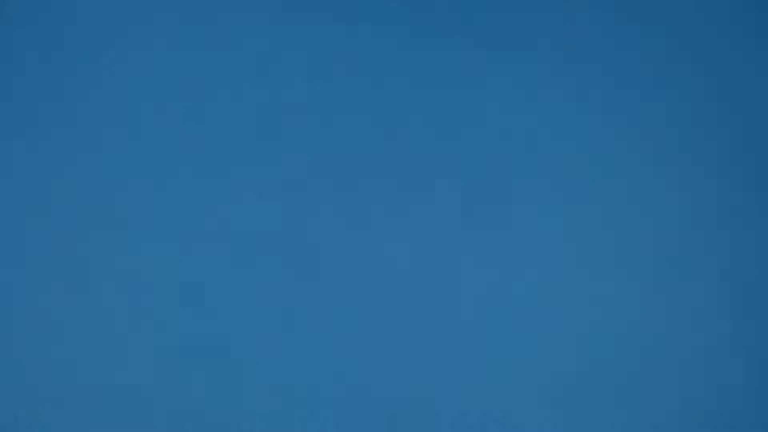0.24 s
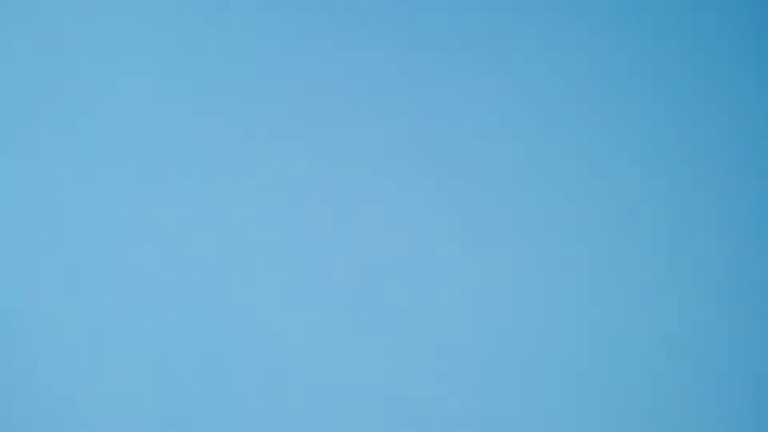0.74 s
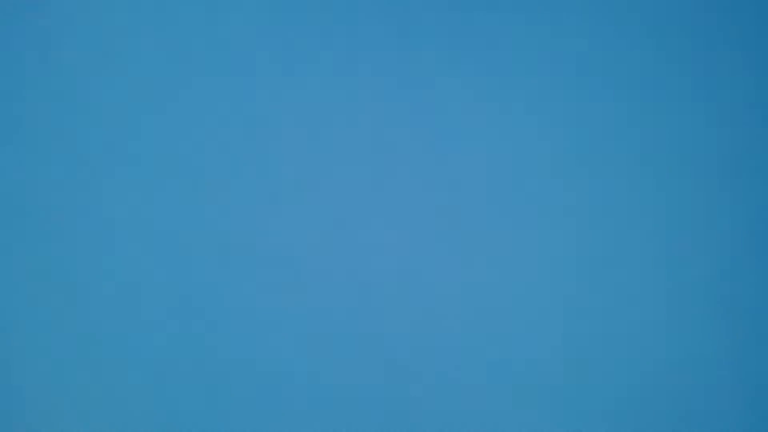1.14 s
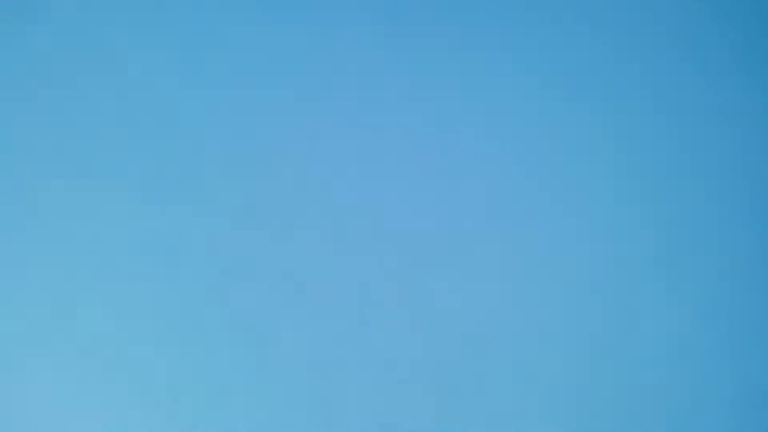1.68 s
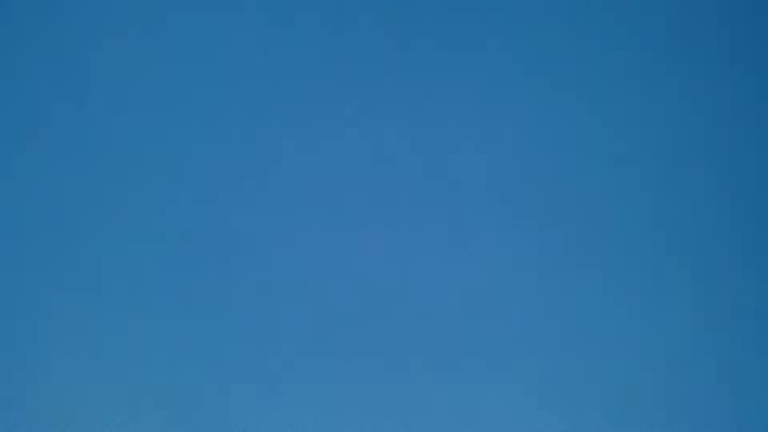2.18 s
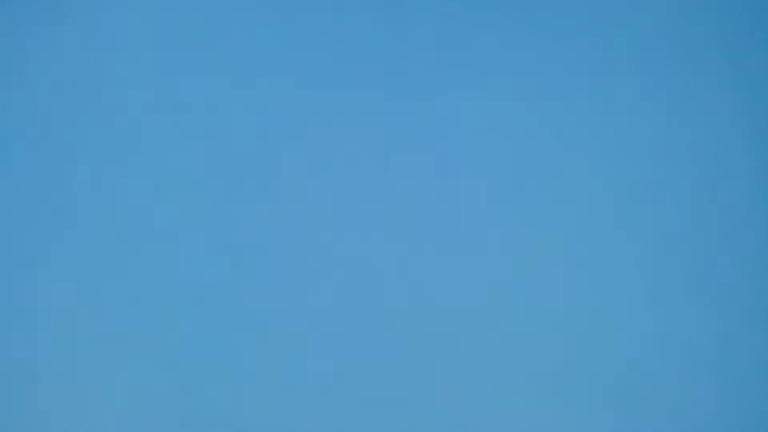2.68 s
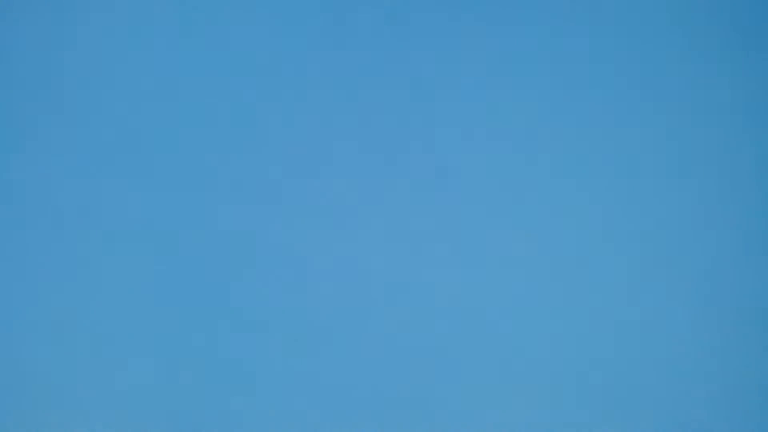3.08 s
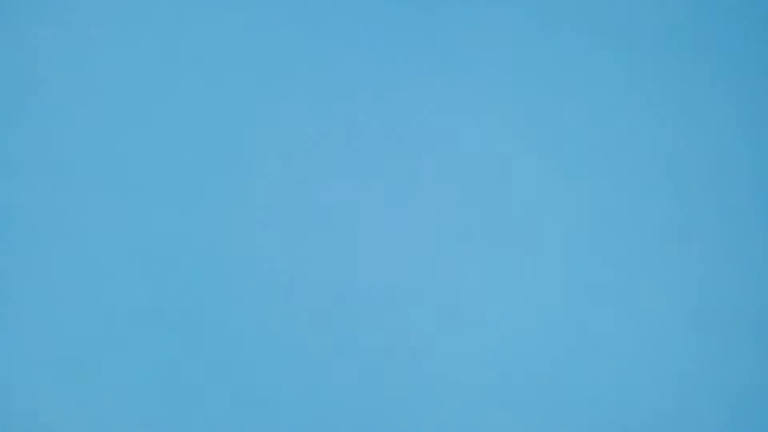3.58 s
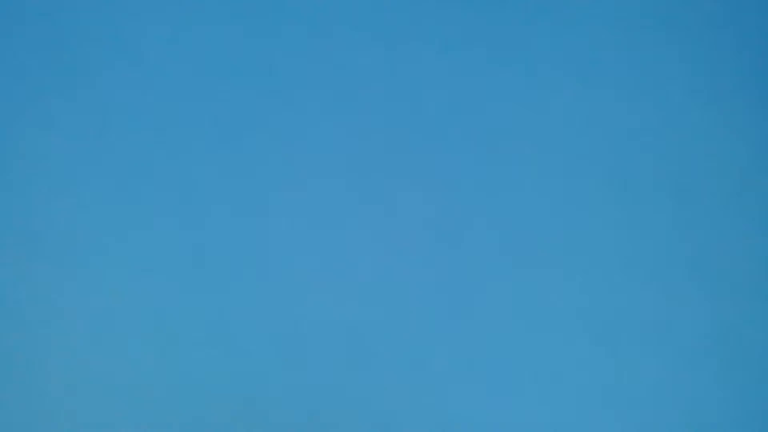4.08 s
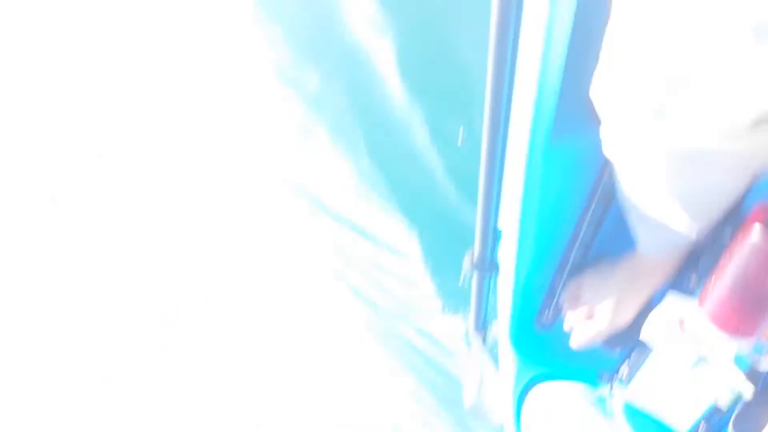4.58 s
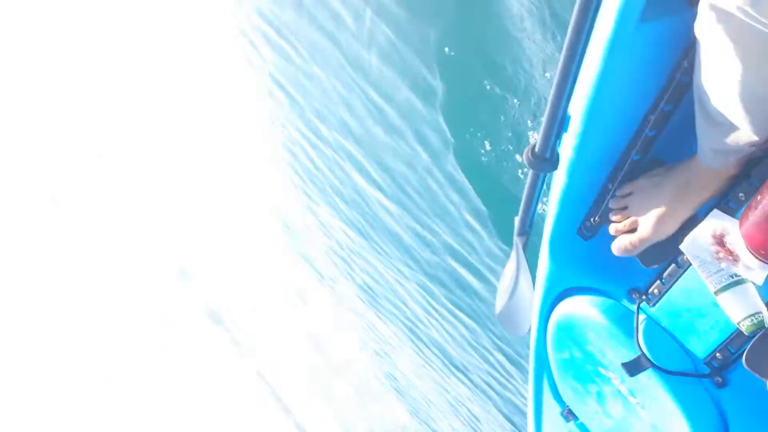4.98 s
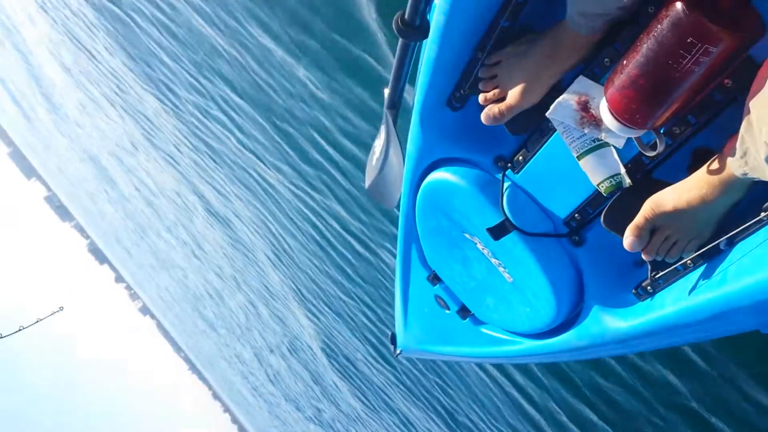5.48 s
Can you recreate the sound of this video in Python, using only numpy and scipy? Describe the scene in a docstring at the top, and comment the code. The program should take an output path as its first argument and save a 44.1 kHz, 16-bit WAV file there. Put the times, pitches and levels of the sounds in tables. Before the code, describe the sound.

Fishing line hisses through rod guides close to the microphone, in quick surges from about 0.2 to 1.5 seconds. A rough whine glides up and down with each tug, dotted with sharp, dry snaps. Small waves slap softly under the kayak around 1.8 seconds, and at 2.2 something thuds on the plastic hull with a brief rub. A second run of hissing, singing line and snaps lasts from 2.8 to 3.4 seconds, followed by single ticks of the reel. From 4 to 4.5 seconds gear knocks on the hull several times while a hand scrapes the microphone, mostly on the left. The drag buzzes in four short spurts at about 4.1, 4.7, 5.4 and 5.6 seconds, each speeding up and slowing, the last three with a light metallic ring. Soft low wind and rippling sea continue underneath, dropping toward the end.

```python
"""Fishing line hisses and sings through the rod guides as a big fish pulls two runs of quick surges.
Then the reel's drag pawl ticks and buzzes in spurts, tooth by tooth, and the metal spool rings.
We are on a kayak at sea, the two microphone ports of a small hand-held camera close to the reel.
Gear knocks on the plastic hull and a hand rubs the camera, over soft wind and water."""
import sys
import numpy as np
from scipy import signal
from scipy.fft import rfft, irfft
from scipy.io import wavfile
from scipy.ndimage import uniform_filter1d

SR = 44100
rng = np.random.default_rng(int(sys.argv[2]) if len(sys.argv) > 2 else 0)


def log_audio(samples):
    """Write samples as a 16-bit WAV file to the path given in sys.argv[1]."""
    # one column per channel
    frames = np.atleast_2d(samples).T
    # limit to full scale, then quantise
    limited = np.clip(frames, -1, 1)
    pcm = np.round(limited * 32767).astype(np.int16)
    wavfile.write(sys.argv[1], SR, pcm)


N = 252894
TIME = np.arange(N) / SR
FREQS = np.fft.rfftfreq(N, 1 / SR)

# The reel's balance at the microphone. Each row: frequency in Hz, left over right in dB.
REEL_LEAN = [(300, 7), (2400, 14.5), (4400, 10.5), (5600, 5), (8200, -16), (15000, -22)]
# The tone of a dry crack, of line or on the hull. Each row: frequency in Hz, relative level in dB.
CRACK_SPECTRUM = [(300, -23.5), (1100, 3), (3200, 0.5), (5400, 12), (15000, -17.5)]


def running_line(hiss_db=1.54, song_db=1.5, flutter_db=1.73, wobble=0.02005, usual_hz=2010):
    """Close by, braid rasps over the guides; its weave gives a rough whine that glides with speed."""
    # The rasp of the guides. Each row: frequency in Hz, relative level in dB.
    hiss_spectrum = [(800, -32), (1300, -13.5), (2050, -8.5), (2450, -16.5), (3200, -11), (4200, -5.5),
                     (5100, 3.5), (6200, -1.5), (6900, 2.5), (7900, -5), (8600, -2), (9750, 1), (10900, -2),
                     (11500, -3), (12300, -5), (13600, -1), (15000, -11.5)]
    # The whine of the weave. Each row: multiple of the pitch, relative level in dB.
    partials = [(2 / 3, -4.5), (1, 2.6), (4 / 3, -9), (2, -9.5)]
    pitch, hiss_gain, song_gain = surges()
    pitch = pitch * (1 + wobble * wander(25))  # the spool slips unevenly
    rasp = patches(noise(0.21), depth_db=3.5) * amp(flutter_db * wander(160))
    hiss = unit(colour(rasp, hiss_spectrum, curve(REEL_LEAN))) * hiss_gain
    song = 0
    for jitter, voice_db in [(0.0114, 0), (0.06, -7)]:  # even weave sings, frayed strands blur the pitch
        cycles = np.cumsum(pitch * (1 + jitter * wander(310))) / SR
        for multiple, db in partials:
            song += amp(voice_db + db + 5.86 * wander(60)) * np.sin(2 * np.pi * multiple * cycles)
    body = amp(curve(hiss_spectrum))  # overtones flare as they glide through these resonances
    body /= np.interp(usual_hz, FREQS, body)
    whine = irfft(rfft(song * song_gain) * body * pan(curve(REEL_LEAN)), N)
    return amp(hiss_db) * hiss + amp(song_db) * whine


def surges(song_lag_s=0.013, hiss_db_per_octave=8.5, song_db_per_octave=9):
    """Each tug drags line out: the fastest sets the pitch, hiss follows speed, song comes just after."""
    # Tugs of the fish. Each row: time of full speed and half-width in seconds, top pitch in Hz,
    # relative hiss and song levels in dB.
    tugs = [(0.214, 0.041, 1883, -28.5, -49), (.305, 0.068, 2146, -27, -50), (0.457, 0.076, 2040, -28, -44),
            (.63, 0.098, 2450, -25, -43), (.745, .082, 2073, -25, -42.5), (.972, 0.1, 2710, -21.5, -41),
            (1.084, 0.063, 2155, -23.5, -39), (1.39, 0.072, 2285, -33, -46.5),
            (1.475, .06, 1951, -40.5, -48), (2.83, .07, 2363, -28.5, -46.5),
            (2.966, 0.079, 2275, -29, -48.5), (3.094, 0.1, 2750, -25, -46.5), (3.245, .1, 2320, -26, -45),
            (3.355, .033, 2056, -23, -40)]
    pitch = hiss_gain = song_gain = 0
    for s, width, top_hz, hiss_db, song_db in tugs:
        speed = bell(s, width) + 1e-12
        late_speed = bell(s + song_lag_s, width) + 1e-12
        pitch = np.maximum(pitch, top_hz * speed)
        hiss_gain = np.maximum(hiss_gain, amp(hiss_db + hiss_db_per_octave * np.log2(speed)))
        song_gain = np.maximum(song_gain, amp(song_db + song_db_per_octave * np.log2(late_speed)))
    return pitch, hiss_gain, song_gain


def line_snaps(level_db=-4, spike_db=9):
    """The line snaps free of the coils beneath it: one spike and a brief spray of noise."""
    # Snaps of the line. Each row: start in seconds, relative level in dB.
    snaps = [(.378, -12), (.385, -8), (.569, -7), (.686, -19), (.7385, -21), (.8175, -10.5), (1.0542, -8),
             (1.614, -28), (1.7765, -19), (1.9545, -20.5), (3.0718, -12), (3.138, -8), (3.149, -12.5),
             (3.225, -20), (3.3515, -5.5), (4.876, -35), (5.0315, -33.5), (5.147, -41)]
    hits = strikes(snaps)
    spray = convolve(hits, decay(t60=0.005)) * noise(0.075)
    return amp(level_db) * colour(amp(spike_db) * hits + spray, CRACK_SPECTRUM, lean_db=2.5)


def reel_drag(pawl_db=-6, tail_db=-18, bounce_db=-7, bounce_s=0.0036, spool_db=-1, rod_db=-22):
    """The pawl drops off each tooth and chatters once; the metal spool rings and the rod buzzes."""
    # Single teeth passing the pawl. Each row: start in seconds, relative level in dB.
    lone_teeth = [(.1055, -17.5), (.1168, -15), (3.4072, -10), (3.4325, -12.5), (3.7645, -7),
                  (3.7972, -6.5), (3.8404, -7), (4.4055, -16.5)]
    # Spurts of the spool. Each row: start, end, time of full speed and half-width in seconds,
    # top rate in teeth per second, relative click level at that rate in dB.
    spurts = [(4.104, 4.315, 4.1402, .0369, 134, -8), (4.5808, 4.785, 4.688, .055, 260, -7.3),
              (5.266, 5.482, 5.3731, .044, 145, -11), (5.4965, 5.684, 5.5885, .0366, 235, -7)]
    # The pawl with a hand on the spool, the pawl with the spool free, and the shaken rod.
    # Each row: frequency in Hz, relative level in dB.
    held_spectrum = [(700, -48), (2500, -18.5), (4000, -15.5), (5200, -5), (6300, -6.5), (7600, -1),
                     (9000, -5), (11000, -1.5), (15000, -9.5)]
    free_spectrum = [(700, -56), (2500, -18.5), (4000, -16.5), (5200, -2), (6300, -7), (7500, -1),
                     (9000, -8.5), (14000, -10.5), (15000, -4)]
    rod_spectrum = [(650, -47), (1000, -1.5), (1300, -11), (1750, 5), (2300, -20.5), (5000, -11.5)]
    # The spool's modes. Each row: frequency in Hz, relative level in dB, seconds to fall 60 dB.
    spool_modes = [(4490, -33.5, 0.23), (4528, -33, 0.26), (5140, -27.5, 0.087), (7295, -35, 0.14),
                   (7440, -37.5, 0.24)]
    # The reel's balance once the camera has turned. Each row: frequency in Hz, left over right in dB.
    turned_lean = [(300, 0.5), (1700, 14.5), (2700, 5), (4400, 12.5), (5600, 5.5), (7500, -13),
                   (9000, -8.5), (15000, -11)]
    turned = curve(turned_lean)
    free = TIME > 4.5  # the hand no longer damps the spool
    hits = strikes(lone_teeth) + sum(strikes(spurt_teeth(*row)) for row in spurts)
    crack = convolve(hits, decay(t60=0.011))
    bounce = amp(bounce_db) * np.roll(crack, round(bounce_s * SR), 1)
    tail = np.sqrt(abs(convolve(hits ** 2, decay(t60=0.08) ** 2)))  # echoes of the teeth add in power
    envelope = np.sqrt(crack ** 2 + bounce ** 2 + (amp(tail_db) * tail) ** 2)
    rattle = envelope * patches(noise(0.13), depth_db=2)
    # Slow teeth hardly excite the ring; it builds just after full speed.
    spin = amp(-14) + sum(bell(peak + 0.027, width=0.062) for _, _, peak, *_ in spurts)
    metal = sum(amp(db) * ring(hz, t60) for hz, db, t60 in spool_modes)
    spool = convolve(hits * free * spin * (1 + .5 * noise(0.68)), metal)
    spool = irfft(rfft(spool) * pan(turned), N)
    rod = colour(tail * free * noise(0.18), rod_spectrum, turned)
    pawl = colour(rattle * ~free, held_spectrum, curve(REEL_LEAN))
    pawl += colour(rattle * free, free_spectrum, turned)
    return amp(pawl_db) * pawl + amp(spool_db) * spool + amp(rod_db) * rod


def spurt_teeth(start, end, peak, width, top_rate, top_db, creep_rate=52, uneven_db=2.63):
    """Time and level of each tooth as the spool speeds up from a creep and slows again."""
    rate = creep_rate + (top_rate - creep_rate) * bell(peak, width)
    count = np.ceil(np.cumsum(rate * (TIME >= start) * (TIME < end)) / SR)
    passing = np.diff(count, prepend=0) > 0
    db = top_db + 2 * np.log2(rate[passing] / top_rate)  # faster teeth click harder
    return zip(TIME[passing], db + uneven_db * rng.standard_normal(N)[:len(db)])


def hull_knocks(falloff_db_per_octave=10):
    """Each blow of gear rings the hull modes nearest its own pitch, with a brief crack of contact."""
    # Blows on the hull. Each row: start in seconds, relative ring level in dB, most excited
    # frequency in Hz, relative crack level in dB, the ring's left over right in dB.
    blows = [(2.1825, -0.5, 102, -16.5, 6), (2.224, -13, 153.7, -46, 5), (3.9582, 1, 106, -18.5, 9),
             (4.0308, -6, 504, -11, 3), (4.065, -9.5, 442, -6.5, 4.5), (4.07, -13, 130, -39, -7),
             (4.228, -9.5, 185, -41, 15), (4.36, -18.5, 490, -29.5, 11), (4.4598, -4, 446, -18, 1.5)]
    # The plastic hull's modes. Each row: frequency in Hz, relative level in dB, seconds to fall 60 dB.
    hull_modes = [(106.5, 3, 0.038), (193, -3.5, 0.032), (320, -8.5, 0.03), (470, 1.5, 0.029),
                  (777, -1, 0.019), (1030, 3.5, 0.018)]
    thuds = np.zeros((2, N))
    for s, db, blow_hz, _, lean_db in blows:
        body = sum(amp(mode_db - falloff_db_per_octave * abs(np.log2(hz / blow_hz))) * ring(hz, t60)
                   for hz, mode_db, t60 in hull_modes)
        add(thuds, s, amp(db) * pan(lean_db) * body)
    contact = strikes([(s, crack_db) for s, _, _, crack_db, _ in blows])
    cracks = convolve(contact, decay(t60=0.0052)) * noise(0.21)
    return thuds + colour(cracks, CRACK_SPECTRUM, lean_db=0)


def handling(skin_db=2.5):
    """Skin sticks and slips on the camera shell, right beside the left port."""
    # Rubs of the hand. Each row: start and length in seconds, relative scrape and skin levels in dB.
    rubs = [(0, .035, -27.5, -31), (0.277, .11, -39, -35.5), (2.184, 0.02, -24.5, -36.5),
            (2.217, 0.046, -35.5, -42.5), (2.28, 0.15, -47, -39.5), (3.826, 0.064, -49, -41),
            (3.954, 0.086, -32, -41), (4.032, 0.052, -23, -37), (4.093, 0.16, -24.5, -30.5),
            (4.266, .08, -33, -36.5), (4.334, 0.032, -32.5, -31.5), (4.412, 0.038, -34, -43),
            (4.501, 0.012, -48, -42)]
    # The dull scrape and the hiss of skin. Each row: frequency in Hz, relative level in dB.
    scrape_spectrum = [(30, 2), (100, -0.5), (250, -6.5), (480, -7.5), (720, -12.5), (2000, -19),
                       (10000, -41)]
    skin_spectrum = [(500, -15.5), (3000, -11.5), (5600, 0), (8500, -13.5), (15000, -18.5)]
    slips = amp(3.08 * wander(97))
    scrape = unit(colour(noise(0.58) * slips, scrape_spectrum, lean_db=14))
    scrape *= sum(amp(db) * stroke(s, length) for s, length, db, _ in rubs)
    skin = unit(colour(noise(0.068) * slips, skin_spectrum, lean_db=13.5))
    skin *= sum(amp(db) * stroke(s, length) for s, length, _, db in rubs)
    return scrape + amp(skin_db) * skin


def stroke(start, length, grip_s=0.002, release_s=0.0087):
    """One rub builds up, holds and dies away."""
    attack = np.clip((TIME - start) / grip_s, 0, 1)
    return attack * np.exp(-np.maximum(TIME - start - length, 0) / release_s)


def wavelet_slaps(swell_s=0.0021):
    """Each wavelet traps a pocket of air under the hull that swells and rings softly."""
    # Slaps under the hull. Each row: start in seconds, relative level in dB, pitch in Hz.
    wavelets = [(1.695, -22.5, 394), (1.72, -23, 290), (1.819, -13, 322), (2.574, -33.5, 373),
                (4.887, -37.5, 430), (5.35, -47, 346)]
    out = np.zeros((2, N))
    swell = 1 - np.exp(-(TIME[:SR // 3] / swell_s) ** 2)
    for s, db, hz in wavelets:
        add(out, s, amp(db) * pan(lean_db=6) * swell * ring(hz, t60=0.04))
    return out


def wind(level_db=-1):
    """A low breeze at the microphone, with passing gusts."""
    # The wind's rumble. Each row: frequency in Hz, relative level in dB.
    spectrum = [(20, -22.5), (62, -1), (145, -0.5), (260, -11), (700, -22), (2000, -67)]
    # Gusts over the breeze. Each row: peak time and half-width in seconds, relative level in dB.
    gusts = [(.3, .25, -43), (1.6, 0.9, -46), (4.45, 0.16, -44.5), (5.75, .12, -47.5)]
    rumble = unit(colour(noise(0.83), spectrum, lean_db=3.5)) * amp(2.6 * wander(4))
    return amp(level_db) * rumble * bed_gain(gusts, steady_db=-47.5, lee_db=-7.5)


def ripple_and_hiss(level_db=1):
    """Soft, broad hiss of line and reel rises and fades late in each run, over a steady water ripple."""
    # The tone of ripple and hiss. Each row: frequency in Hz, relative level in dB.
    spectrum = [(300, 1), (1900, 0.5), (2800, -3.5), (4000, -2), (5200, 2), (6300, -6), (7400, -3),
                (15000, -13.5)]
    # Rises of the hiss. Each row: peak time and half-width in seconds, relative level in dB.
    hiss_rises = [(1.22, 0.36, -38.5), (3.35, 0.28, -44)]
    flutter = noise(0.27) * amp(1.47 * wander(51))
    wash = unit(colour(flutter, spectrum, 0.78 * curve(REEL_LEAN)))
    return amp(level_db) * wash * bed_gain(hiss_rises, steady_db=-48.5, lee_db=-15.5)


def bed_gain(rises, steady_db, lee_db, turn_s=4.13, turn_length_s=1):
    """Gain of a steady bed that drops as the camera turns into the lee, with passing rises on top."""
    steady = amp(steady_db + lee_db * np.clip((TIME - turn_s) / turn_length_s, 0, 1))
    return np.sqrt(steady ** 2 + sum((amp(db) * bell(s, width)) ** 2 for s, width, db in rises))


def amp(db):
    """Decibels to gain."""
    return 10 ** (np.asarray(db) / 20)


def unit(x):
    """Scales to rms 1."""
    return x / np.sqrt(np.mean(x ** 2) + 1e-20)


def curve(points):
    """Joins the points of a spectrum on a log-frequency axis."""
    hz, value = np.transpose(points)
    return np.interp(np.log(FREQS + 1), np.log(hz), value)


def pan(lean_db):
    """Left and right gains of constant power; positive leans left."""
    ratio = amp(np.atleast_1d(lean_db))
    return np.array([ratio, np.ones_like(ratio)]) * np.sqrt(2 / (1 + ratio ** 2))


def colour(x, spectrum, lean_db):
    """Causal filter of unit power gain, with its own slant at each port."""
    gain = np.maximum(unit(amp(curve(spectrum))) * pan(lean_db), 1e-5)
    cepstrum = irfft(np.log(gain), N)
    fold = 1 + np.sign(N / 2 - np.arange(N))  # gives minimum phase
    fold[0] = 1
    return irfft(rfft(x) * np.exp(rfft(cepstrum * fold)), N)


def noise(shared):
    """Two channels of white noise with a share in common."""
    return np.sqrt(shared) * rng.standard_normal(N) + np.sqrt(1 - shared) * rng.standard_normal((2, N))


def wander(rate_hz):
    """Smooth random drift of rms 1."""
    return unit(irfft(rfft(rng.standard_normal(N)) / (1 + (FREQS / rate_hz) ** 4), N))


def patches(x, depth_db, size=9):
    """Lets narrow bands swell and fade on their own for some milliseconds."""
    bands = signal.stft(x, nperseg=256)[2]
    drift = uniform_filter1d(rng.standard_normal(bands.shape), size, axis=2)
    drift = unit(uniform_filter1d(drift, size // 2, axis=1))
    return signal.istft(bands * amp(depth_db * drift))[1][:, :N]


def bell(s, width):
    """A smooth rise and fall, 1 at time s."""
    return np.exp(-.5 * ((TIME - s) / width) ** 2)


def decay(t60):
    """A dying envelope, a third of a second long."""
    return 1e-3 ** (TIME[:SR // 3] / t60)


def ring(hz, t60):
    """One struck mode."""
    return decay(t60) * np.sin(2 * np.pi * hz * TIME[:SR // 3])


def convolve(x, response):
    """Convolves each channel and keeps the scene's length."""
    return signal.oaconvolve(np.atleast_2d(x), np.atleast_2d(response), axes=1)[:, :N]


def add(mix, s, sound):
    """Mixes a stereo sound in at time s."""
    part = mix[:, max(round(s * SR), 0):][:, :sound.shape[1]]
    part += sound[:, :part.shape[1]]


def strikes(rows):
    """Stereo impulses from rows of time and level."""
    out = np.zeros((2, N))
    for s, db in rows:
        add(out, s, amp(db) * pan(0))
    return out


def lag_left(x, lag_s=0.000296):
    """Delays the left port against the right."""
    return irfft(rfft(x) * np.exp(-2j * np.pi * FREQS * np.array([[lag_s], [0]])), N)


def scene():
    """Line and reel up close; hull, hand and background reach the left port a little later."""
    tackle = running_line() + line_snaps() + reel_drag()
    return tackle + lag_left(hull_knocks() + wavelet_slaps() + handling() + wind() + ripple_and_hiss())


def record(dry, low_hz=34, ceiling=0.95, high_hz=14580):
    """The deepest bass is filtered out, the input clips any overload, and the top treble is cut."""
    thinned = signal.sosfilt(signal.butter(2, low_hz, "high", fs=SR, output="sos"), dry)
    clipped = np.clip(thinned, -ceiling, ceiling)
    lowpass = signal.firwin(301, high_hz, window=("kaiser", 7), fs=SR)
    return signal.oaconvolve(clipped, lowpass[None], "same")


dry = scene()
out = record(dry)
log_audio(out)
```